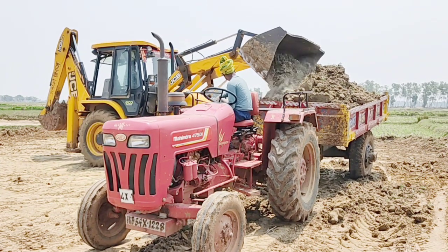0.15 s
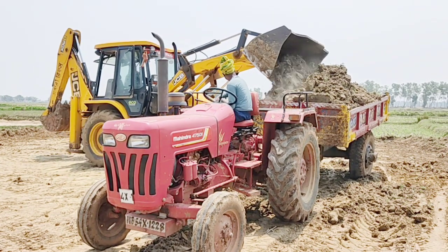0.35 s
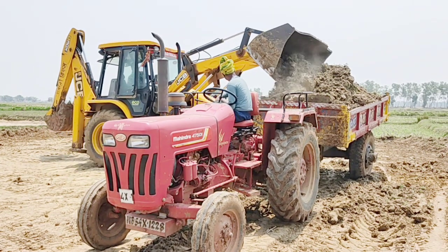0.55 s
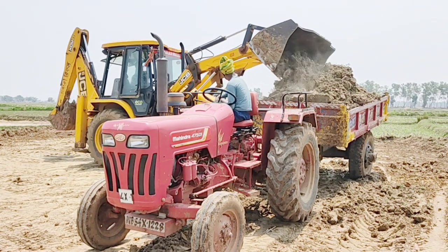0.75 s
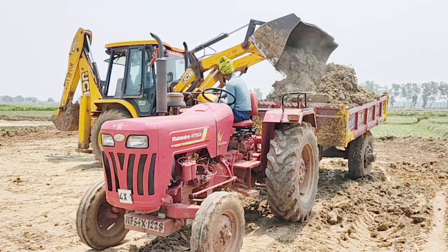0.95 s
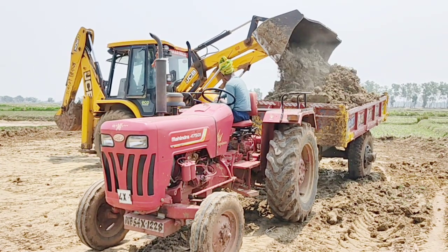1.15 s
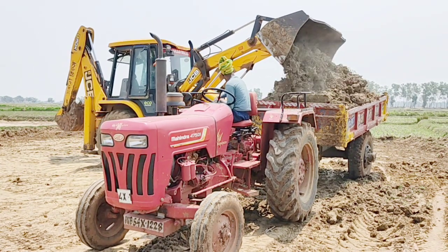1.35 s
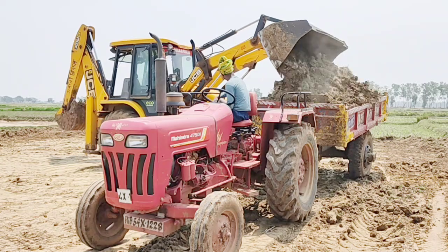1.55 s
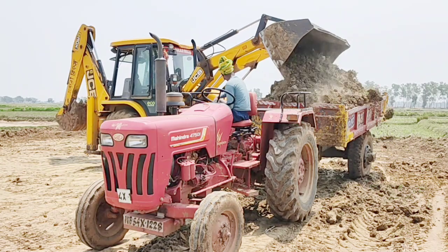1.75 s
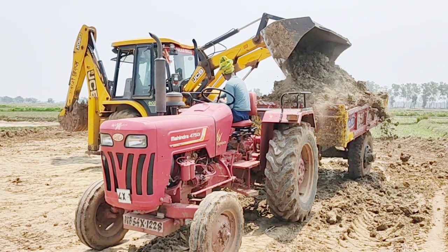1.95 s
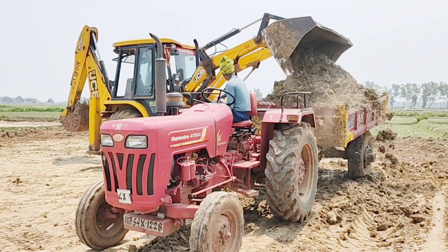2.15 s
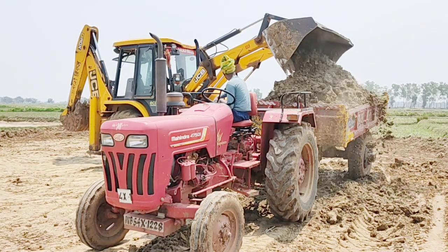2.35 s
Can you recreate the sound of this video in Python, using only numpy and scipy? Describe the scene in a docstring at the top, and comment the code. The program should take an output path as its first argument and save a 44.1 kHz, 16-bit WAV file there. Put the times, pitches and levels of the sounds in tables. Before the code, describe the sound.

Heavy diesel engine rumbles and knocks as a steel bucket bangs, dumping mud into a trailer

```python
"""A four-cylinder diesel speeds up and knocks under load: a backhoe loader tips mud into a trailer.
The steel bucket clanks, then bangs against its stop; clods thud and crumble into the trailer.
Engine: exhaust harmonics, gated combustion noise and drifting panel rings, all locked to the firings.
Bucket: decaying noise crash plus ringing modes. Mud: filtered random impulses.
Behind them a steady noise wash; low noise puffs are the breeze buffeting the two microphone ports."""
import sys
import numpy as np
from scipy import signal
from scipy.fft import rfft, irfft
from scipy.io import wavfile
from scipy.ndimage import uniform_filter1d

SR = 44100
rng = np.random.default_rng(int(sys.argv[2]) if len(sys.argv) > 2 else 0)


def int16_out(signal):
    """Quantize to a 16-bit WAV file."""
    q = np.round(np.clip(np.atleast_2d(signal).T, -1, 1) * 32767)
    wavfile.write(sys.argv[1], SR, q.astype(np.int16))


N = 110250
TIME, HZ = np.arange(N) / SR, np.fft.rfftfreq(N, 1 / SR)

# wind puffs, each on one port: start_s, length_s, level_db, port (0 left, 1 right)
WIND_PUFFS = [(0.231, 0.16, -24.5, 1), (0.483, 0.013, -15, 0), (0.528, 0.073, -25.5, 0),
              (0.887, 0.048, -22, 0), (1.135, 0.049, -23.5, 0), (1.547, 0.047, -16.5, 0),
              (1.637, 0.032, -13, 0), (1.836, 0.074, -19, 0), (1.882, 0.044, -17.5, 0),
              (1.955, 0.044, -23, 0), (2.082, 0.043, -24, 0), (2.192, 0.03, -23, 0)]
# wind buffet spectrum: freq_hz, relative_db_per_hz
BUFFET_SPECTRUM = [(40, -28), (110, -13.5), (175, 3), (300, -4.5), (9000, -95)]

# fans and distant machinery, spectrum: freq_hz, relative_db_per_hz
WASH_SPECTRUM = [(25, 4.5), (170, 1), (450, -3.5), (1100, -11), (2200, -17), (4700, -24.5), (6000, -18.5),
                 (8200, -23.5), (9200, -40), (14000, -45.5)]
WASH_DB, WASH_PATCH_DB = -35.5, 2.5

# mud landing in the trailer: time_s, level_db
MUD_LEVEL = [(0, -49.5), (1.6, -29), (1.69, -19), (1.78, -23.5), (1.88, -36.5), (2.0, -34), (2.5, -44)]
# thud spectrum: freq_hz, relative_db
THUD_SPECTRUM = [(50, -14.5), (205, 3.5), (900, -27), (8000, -43), (10000, -67)]
CLODS_PER_S, CLOD_SCATTER_DB = 450, 5

# bucket blows: start_s, level_db, t60_scale, treble_tilt_db_per_octave
BUCKET_BLOWS = [(.188, -18, 0.5, 4.5), (.32, -20, 0.9, -0.5), (1.462, -11.5, 1, 1), (1.484, -14.5, 0.54, 2),
                (1.655, -1.5, 0.78, 1), (1.667, -3.5, 1, -1), (1.722, -18, .5, 1.5),
                (1.764, -10.5, 0.65, 0)]
# steel bucket modes, t60 before the blow's scale: freq_hz, relative_db, t60_s
BUCKET_MODES = [(187, -0.5, 0.67), (262.8, 5, 0.26), (372.2, 0.5, 0.21), (497, -3, 0.24), (716, -7.5, 0.92),
                (796, -4.5, 0.11), (881, -4, 0.38), (1092, -4.5, 0.22), (1252, -2.5, 0.21),
                (1330, -8, 0.15), (1700, -7, 0.13), (1986, -10, 0.21)]
# crash spectrum: freq_hz, relative_db_per_hz
CRASH_SPECTRUM = [(60, -16), (180, -4), (1000, -3), (1700, -11), (4500, -30), (8200, -28.5), (9200, -44.5),
                  (14000, -57)]
# crash decay before the blow's scale: freq_hz, t60_s
CRASH_DECAY = [(150, 0.23), (1000, 0.13), (8000, 0.39)]
RING_DB, CRASH_DB, BLOW_RISE_S = -19, -12, 0.003

# engine speed: time_s, firings_per_s
FIRING_RATE = [(0.0, 32.84), (0.15, 32.05), (0.35, 34.78), (0.57, 34.09), (0.75, 38.62), (1.0, 37.74),
               (1.3, 39.85), (1.5, 37.91), (1.9, 38.72), (2.2, 37.12), (2.5, 33.74)]
# engine effort, relative levels: time_s, exhaust_db, clatter_db, knock_db
ENGINE_EFFORT = [(0, -4, -9, -28), (.3, -2, -12, -14), (.57, -1.5, -3.5, -15), (.64, -0.5, 8, -1.5),
                 (.92, 0, 3.5, -5), (1.08, -3, 3, -5), (1.24, 1, 3.5, -2.5), (1.43, -7.5, -1, -12),
                 (1.85, -3, 1.5, -7), (2.25, -11, -2, -26.5), (2.5, -11, 0, -16)]
# exhaust harmonics: multiple_of_firing_rate, relative_db
EXHAUST_ORDERS = [(1, -31.5), (2, -33.5), (3, -28), (4, -44), (5, -52), (6, -45)]
EXHAUST_LAG_FIRINGS, EXHAUST_LEFT_MINUS_RIGHT_DB = 0.513, 11
EXHAUST_ROUGH_SHARE = 0.16  # rms
# cylinders in firing order: cycle_place_firings, relative_clatter_db, relative_knock_db
CYLINDER_BURSTS = [(.03, -9, 7.5), (1.05, -8.5, -3.5), (2.02, -9, 4.5), (3.05, -6, 0.5)]
# combustion clatter spectrum: freq_hz, relative_db_per_hz
CLATTER_SPECTRUM = [(150, 4.5), (340, -10), (620, -9), (800, -25), (1000, -2), (1350, -26.5), (1900, -17.5),
                    (4700, -26.5), (8200, -24.5), (9200, -44), (14000, -51)]
CLATTER_DB, CLATTER_SCATTER_DB = -36.5, 0.7
CLATTER_RISE_FIRINGS, CLATTER_FALL_FIRINGS = 0.22, 0.6
# engine panels rung by the knock: freq_hz, width_hz, relative_db
ENGINE_PANELS = [(342, 35, 0), (556, 31.2, -4.5), (746, 23, -9), (947, 28, 1), (1132, 51, -5.5),
                 (1490, 21.3, -13)]
KNOCK_DB, KNOCK_SCATTER_DB = -30, 1
KNOCK_RISE_FIRINGS, KNOCK_FALL_FIRINGS = 0.42, 0.6
KNOCK_DRIFT_WIDTHS, KNOCK_FLUTTER_SHARE = 0.5, 0.2  # rms
RIPPLE_DB, RIPPLE_HZ = 2, 45  # rms depth, knot spacing

# port level difference: freq_hz, left_minus_right_db
PORT_LEAN = [(60, 10.5), (1200, 8.5), (2300, 3.5), (7500, 0.5)]
# port likeness: freq_hz, correlation
PORT_LIKENESS = [(280, 0.62), (800, .82), (3000, 0.12)]
# port phase: freq_hz, left_lead_rad
PORT_LEAD = [(300, -0.5), (1400, 0.5), (5000, -2.5)]
OVERLOAD, EDGE_HZ = 1.15, 14200  # ceiling (full scale = 1), band limit


def amp(db):
    """Amplitude ratio from dB."""
    return 10 ** (np.asarray(db) / 20)


def unit(x):
    """Scale to an rms of 1."""
    return x / np.sqrt(np.mean(x ** 2) + 1e-20)


def read(points, hz=HZ):
    """Frequency table interpolated on a log-frequency axis."""
    table_hz, value = np.transpose(points)
    return np.interp(np.log(hz + 1), np.log(table_hz + 1), value)


def curve(table, axis=1):
    """One column of a time table at every sample."""
    table = np.array(table)
    return np.interp(TIME, table[:, 0], table[:, axis])


def noise(gain):
    """Two unrelated noises of one colour."""
    white = rng.standard_normal((2, N))
    return unit(irfft(rfft(white) * gain, N))


def ripple():
    """Many small fixed resonances of a steel body, as an uneven gain over frequency."""
    knots_hz = np.arange(0, SR / 2, RIPPLE_HZ)
    knots_db = RIPPLE_DB * rng.standard_normal(len(knots_hz))
    return amp(np.interp(HZ, knots_hz, knots_db))


def wind():
    """Short low noise puffs, each swelling and fading on a single port."""
    out = np.zeros((2, N))
    for start_s, length_s, level_db, port in WIND_PUFFS:
        swell = np.sin(np.pi * np.linspace(0, 1, round(length_s * SR)) ** 1.02)
        flutter = noise(amp(read(BUFFET_SPECTRUM)))[0, :len(swell)]
        part = out[round(port), round(start_s * SR):][:len(swell)]
        part += amp(level_db) * unit(flutter * swell)[:len(part)]
    return out


def wash():
    """Steady machine noise with patches drifting over time and frequency."""
    z = signal.stft(noise(amp(read(WASH_SPECTRUM))), nperseg=512)[2]
    patches = uniform_filter1d(rng.standard_normal(z.shape[1:]), size=9, axis=0)
    patches = unit(uniform_filter1d(patches, size=8, axis=1))
    patched = signal.istft(z * amp(WASH_PATCH_DB * patches), nperseg=512)[1][:, :N]
    return amp(WASH_DB) * unit(patched)


def mud():
    """Clods as random impulses of either sign, dulled to thuds on the loaded trailer."""
    hits = rng.random((2, N)) < CLODS_PER_S / SR
    signs = rng.choice([-1, 1], (2, N))
    sizes = amp(CLOD_SCATTER_DB * np.minimum(rng.exponential(1, (2, N)), 3))
    thuds = irfft(rfft(hits * signs * sizes) * amp(read(THUD_SPECTRUM)), N)
    return unit(thuds) * amp(curve(MUD_LEVEL))


def treble_tilt(hz, db_per_octave):
    """Gain sloping about 1 kHz, level beyond 150 Hz and 5 kHz."""
    return amp(db_per_octave * np.log2(np.clip(hz, 150, 5000) / 1000))


def bucket():
    """Each blow is a crash of dense modes, as decaying noise, with the main modes ringing on."""
    out, t = np.zeros((2, N)), TIME[:SR // 2]
    colour = amp(read(CRASH_SPECTRUM)) * ripple()
    for start_s, level_db, t60_scale, tilt_db in BUCKET_BLOWS:
        hz, age_s, z = signal.stft(noise(colour)[:, :len(t)], SR, nperseg=256)
        crash_t60_s = t60_scale * read(CRASH_DECAY, hz)[:, None]
        z = z * treble_tilt(hz, tilt_db)[:, None] * np.exp(-np.log(1000) * age_s / crash_t60_s)
        blow = amp(CRASH_DB) * signal.istft(z, nperseg=256)[1][:, :len(t)]
        for freq_hz, mode_db, t60_s in BUCKET_MODES:
            decay = np.exp(-np.log(1000) * t / (t60_s * t60_scale))
            tone = np.sin(2 * np.pi * (freq_hz * t + rng.random((2, 1))))
            blow += amp(RING_DB + mode_db) * treble_tilt(freq_hz, tilt_db) * decay * tone
        blow = amp(level_db) * blow * np.minimum(t / BLOW_RISE_S, 1)
        part = out[:, round(start_s * SR):][:, :len(t)]
        part += blow[:, :part.shape[1]]
    return out


def bursts(turns, rise, fall, scatter_db, axis):
    """One swell and decay per firing, its strength set by the cylinder and by chance."""
    count, env = len(CYLINDER_BURSTS), np.zeros(N)
    for k, chance in enumerate(rng.standard_normal(size=104)):
        row = CYLINDER_BURSTS[k % count]
        start = (k // count - 1) * count + row[0]  # from one cycle early
        a, b = np.searchsorted(turns, [start, start + count])
        age = turns[a:b] - start
        shape = np.minimum(age / rise, 1) * np.exp(-np.maximum(age - rise, 0) / fall)
        env[a:b] += amp(row[axis] + scatter_db * chance) * shape
    return unit(env)


def exhaust(turns):
    """Low pulses, one per firing, with a strong third harmonic from the pipe."""
    out = np.zeros(N)
    for order, db in EXHAUST_ORDERS:
        waver = noise(1 / (1 + (HZ / 14) ** 4))[0]
        tone = np.cos(2 * np.pi * round(order) * (turns - EXHAUST_LAG_FIRINGS))
        out -= amp(db) * (1 + EXHAUST_ROUGH_SHARE * waver) * tone
    pan = amp(np.array([[1], [-1]]) * EXHAUST_LEFT_MINUS_RIGHT_DB / 2)
    return out * amp(curve(ENGINE_EFFORT, axis=1)) * pan


def clatter(turns):
    """A wide burst of combustion noise at every firing, coloured by the engine block."""
    gate = bursts(turns, CLATTER_RISE_FIRINGS, CLATTER_FALL_FIRINGS, CLATTER_SCATTER_DB, axis=1)
    combustion = noise(amp(read(CLATTER_SPECTRUM)) * ripple())
    return combustion * gate * amp(CLATTER_DB + curve(ENGINE_EFFORT, axis=2))


def knock(turns):
    """Firings ring the panels, every other one harder; rings drift in pitch and strength."""
    rings = 0
    for freq_hz, width_hz, db in ENGINE_PANELS:
        slow = 1 / (1 + (HZ / width_hz) ** 2)
        pitch_hz = freq_hz + KNOCK_DRIFT_WIDTHS * width_hz * noise(slow)
        strength = amp(db) * (1 + KNOCK_FLUTTER_SHARE * noise(slow))
        rings = rings + strength * np.sin(2 * np.pi * np.cumsum(pitch_hz, axis=1) / SR)
    gate = bursts(turns, KNOCK_RISE_FIRINGS, KNOCK_FALL_FIRINGS, KNOCK_SCATTER_DB, axis=2)
    return unit(rings) * gate * amp(KNOCK_DB + curve(ENGINE_EFFORT, axis=3))


def ports(pair):
    """Two unrelated versions of a sound become what the left and right ports pick up."""
    a, b = rfft(pair)
    same = np.clip(read(PORT_LIKENESS), -1, 1)
    lean = amp(read(PORT_LEAN) / 2)
    right = (same * a + np.sqrt(1 - same ** 2) * b) * np.exp(-1j * read(PORT_LEAD))
    return irfft(np.array([a * lean, right / lean]), N)


def scene():
    """Engine layers share one firing count; wind and exhaust bypass the port model."""
    turns = np.cumsum(curve(FIRING_RATE)) / SR  # firings so far
    engine = clatter(turns) + knock(turns)
    return wind() + ports(wash() + mud() + bucket() + engine) + exhaust(turns)


def record(dry):
    """Soft overload rounds the peaks, then the band limit."""
    rounded = OVERLOAD * np.tanh(dry / OVERLOAD)
    lowpass = signal.firwin(511, EDGE_HZ, window=("kaiser", 9), fs=SR)
    return signal.oaconvolve(rounded, lowpass[None], "same")


dry = scene()
out = record(dry)
int16_out(out)
```